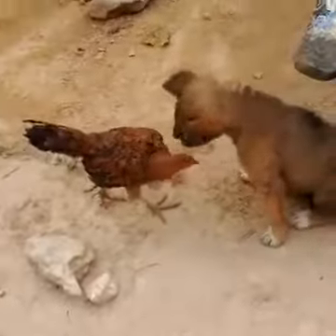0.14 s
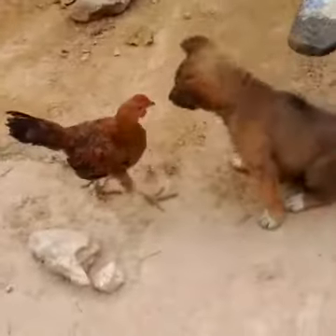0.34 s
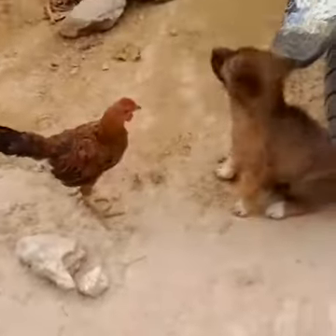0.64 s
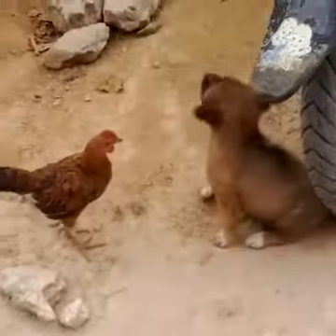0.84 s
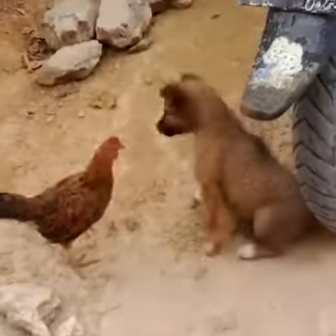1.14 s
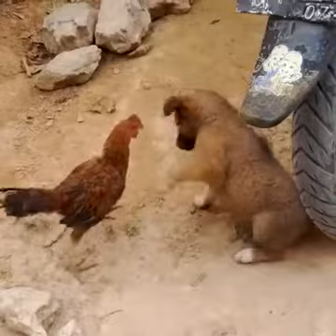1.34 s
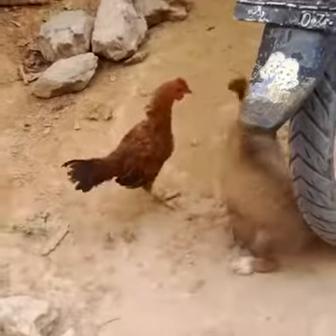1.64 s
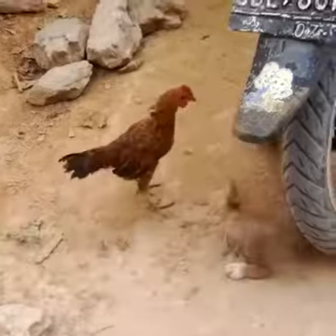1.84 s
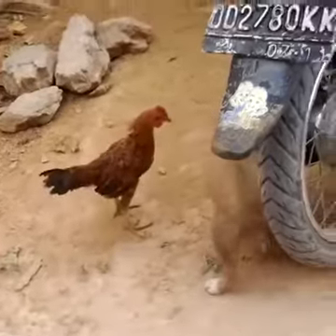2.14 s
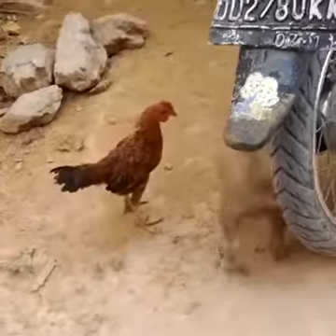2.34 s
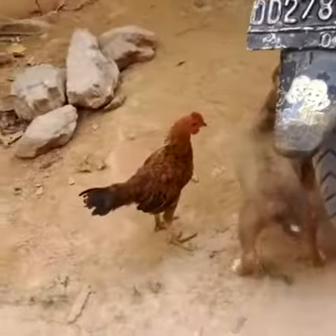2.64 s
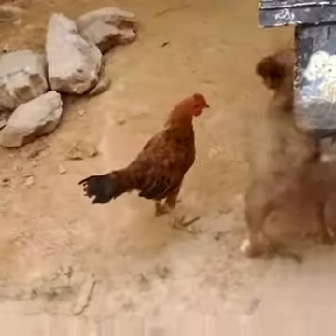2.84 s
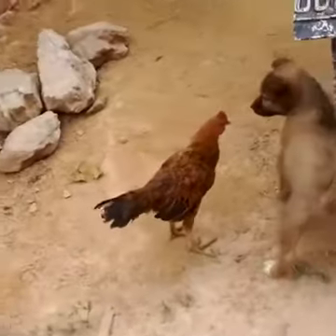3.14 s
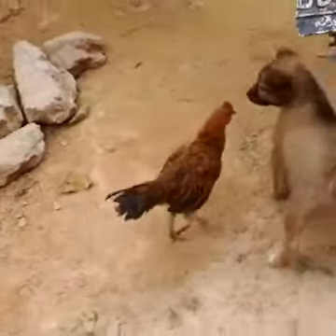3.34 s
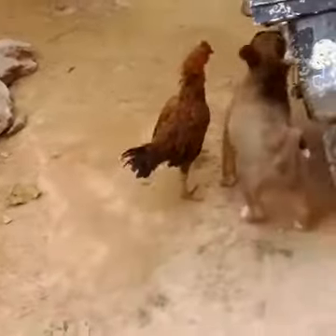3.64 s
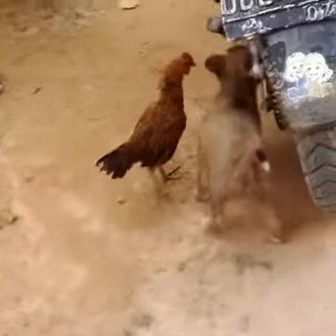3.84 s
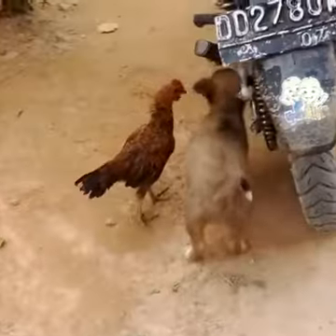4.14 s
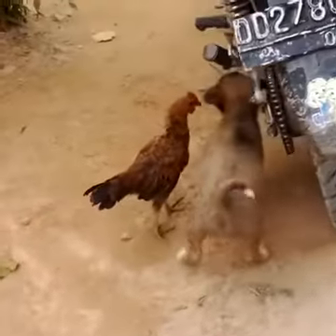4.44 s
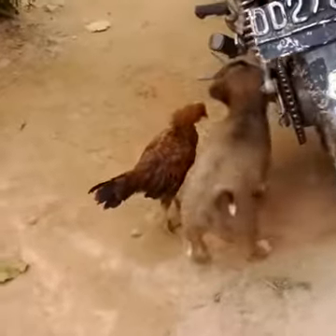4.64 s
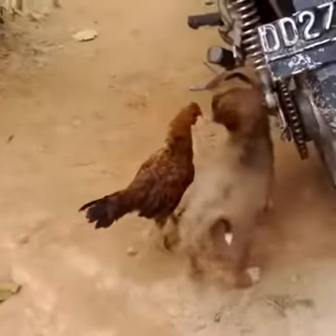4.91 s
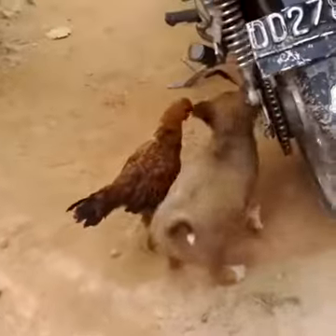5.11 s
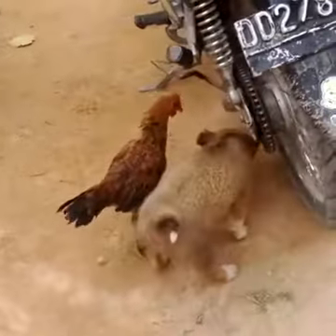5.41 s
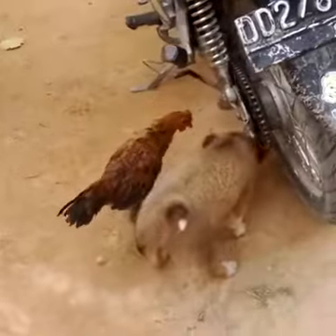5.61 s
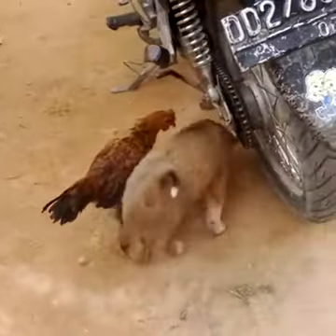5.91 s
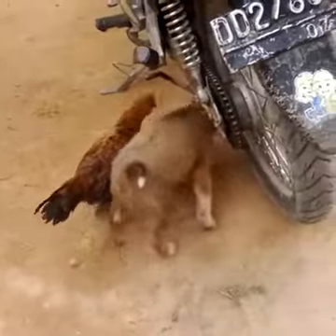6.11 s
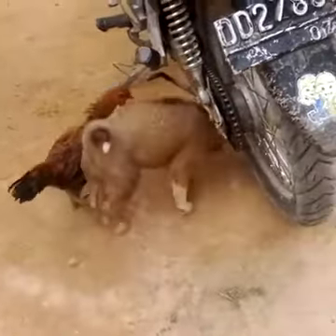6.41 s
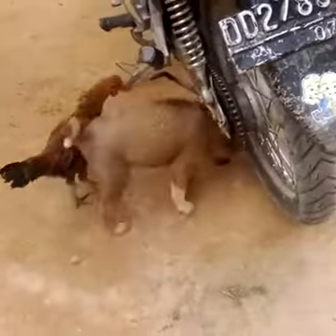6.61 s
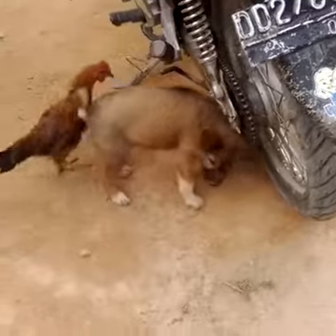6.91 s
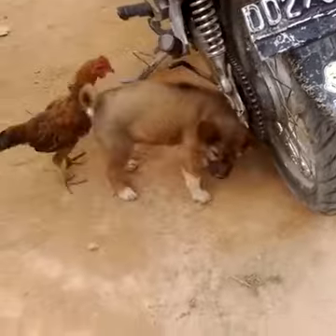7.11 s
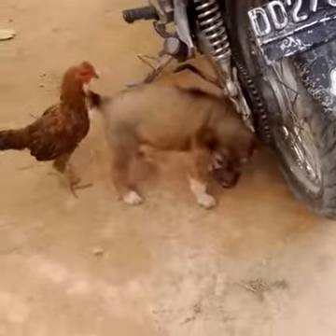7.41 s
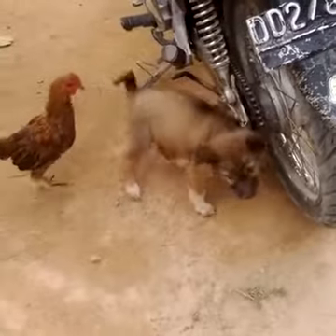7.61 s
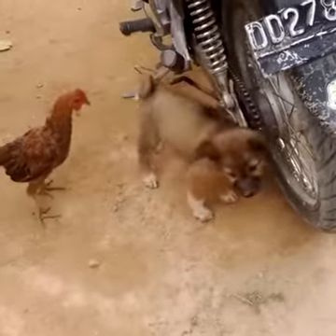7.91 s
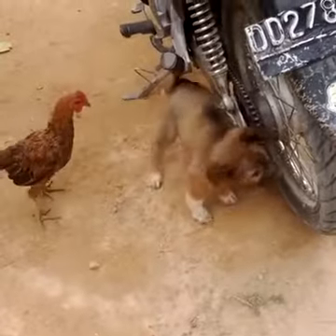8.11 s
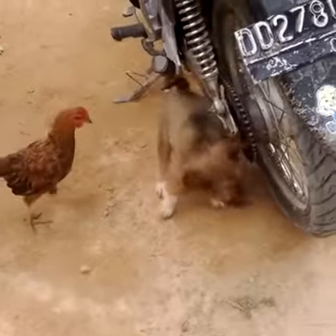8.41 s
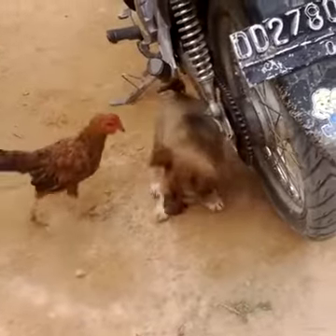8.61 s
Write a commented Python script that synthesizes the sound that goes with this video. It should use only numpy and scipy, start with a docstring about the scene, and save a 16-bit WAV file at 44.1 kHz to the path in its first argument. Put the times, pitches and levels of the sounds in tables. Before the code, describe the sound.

A puppy and chicken scuffle in grit, then a young cock crows close by, hoarse and breaking, over windy microphone rumble and distant steady pounding.

```python
"""Young cock in a dirt yard

Close to the microphone a chicken and a puppy scuffle: noise grains for grit, short clicks for pebbles.
A young cock crows close by, hoarse and breaking: two membranes of throbbing tones, with noise for air.
Far off something heavy is pounded at a steady pace: a soft push, ringing modes and a slap-back.
Wind puffs on the microphone as random soft lumps, over a thin hiss of drifting noise.
"""
import sys
import numpy as np
from scipy import signal
from scipy.fft import rfft, irfft
from scipy.io import wavfile
from scipy.ndimage import uniform_filter1d

SR = 44100
rng = np.random.default_rng(int(sys.argv[2]) if len(sys.argv) > 2 else 0)


def bounce(signal):
    """Save signal as a 16-bit WAV file at the path given by the first command-line argument."""
    frames = np.transpose(np.atleast_2d(signal))
    limited = np.clip(frames, -1, 1)
    pcm = np.round(limited * 32767).astype(np.int16)
    wavfile.write(sys.argv[1], SR, pcm)


N = 385875
T = np.arange(N) / SR
EDGE_HZ = 15750  # top of the recorder's band

# Open-air hiss. Each row: frequency in Hz, density in dB per Hz (relative).
HISS_COLOUR = [(59, -32), (100, -11.5), (229, -4), (295, -7), (502, -5), (648, -10), (1170, -13),
               (1910, -17), (3540, -18.5), (5300, -21.5), (6420, -12), (7450, -21), (9610, -26),
               (14100, -26.5), (16000, -22)]
HISS_DB = -57

# Wind on the microphone. Each row: time in seconds, large eddies and small eddies in dB (relative).
WIND_LEVELS = [(0, -48, -56), (.6, -54, -50), (.8, -56, -55), (1.25, -60, -57), (2.1, -59, -58),
               (2.3, -40, -52), (2.38, -33, -40), (2.68, -32, -31), (2.75, -52, -60), (3.3, -49, -56),
               (4.0, -52, -58), (5.05, -48, -58), (5.2, -43, -60), (5.62, -37, -46), (5.68, -46, -52),
               (6.1, -56, -59), (7.4, -51, -55), (7.7, -43, -60), (8.25, -48, -55), (8.75, -47, -55)]
# Single puffs of wind. Each row: peak time in seconds, level in dB (relative), length in seconds.
WIND_PUFFS = [(0, -30, .06), (.09, -34, .1), (.46, -43, .1), (.7, -48.5, .1), (2.19, -43, .12),
              (2.85, -34.5, .06), (3.02, -32, .07), (3.09, -35, .1), (3.24, -37.5, .12), (3.73, -43, .12),
              (3.87, -39, .1), (3.97, -33.5, .07), (4.09, -38.5, .1), (4.26, -38, .15), (4.46, -39, .12),
              (4.56, -33, .12), (5.12, -37, .1), (5.19, -35, .1), (5.39, -29, .1), (5.48, -27, .07),
              (5.61, -26, .05), (5.78, -37, .15), (5.85, -34.5, .08), (6.0, -42.5, .18), (6.24, -40, .1),
              (6.38, -38, .08), (6.68, -43, .15), (6.99, -47, .15), (7.14, -37, .07), (7.9, -34.5, .1),
              (8.04, -33, .12), (8.58, -42, .15), (8.7, -37, .08)]
PUFF_RISE, PUFF_FALL = .6, .7  # times for 20 dB, as shares of the length
PUFF_EDGE_DB = -17  # small eddies in a puff
RUMBLE_DB, RUMBLE_FALL_S = -9, .2  # rumble after a blow, before the wind mix; time for 20 dB

# Paws and claws dragged in grit. Each row: start of hold in seconds, hold in seconds,
# grit level in dB, dull part in dB.
PAW_SCUFFS = [(.062, .02, -68, -50), (.226, .008, -58, -50), (.284, .02, -52, -58), (.31, .035, -48, -54),
              (.352, .055, -49, -47), (.579, .012, -39, -38), (.598, .018, -35, -46)]
SCUFF_RISE_S, SCUFF_FALL_S = .006, .018  # times for 20 dB
# Colour of the grit. Each row: frequency in Hz, level in dB (relative).
GRIT_COLOUR = [(880, -28), (1500, -4.5), (2910, -8), (5830, -6), (8490, -15), (14100, -12), (16000, -5)]
# Colour of the dull drag beneath, same columns.
DRAG_COLOUR = [(120, -27), (250, 3), (600, 3), (1000, -7.5), (1500, -11), (2200, -27)]
# Single pebble clicks. Each row: start in seconds, level in dB, centre in Hz, knock in dB (relative).
PEBBLE_CLICKS = [(0.0624, -50, 14800, -57), (0.0757, -42, 14600, -56), (0.2224, -30, 13600, -30.5),
                 (0.2823, -31, 14000, -51), (0.5811, -29, 13800, -53), (0.7716, -43, 6840, -61),
                 (0.7924, -51, 6780, -63), (0.8074, -47, 6540, -61), (1.5544, -52, 14400, -58),
                 (1.5738, -38, 14100, -55), (1.7225, -41, 14100, -62)]
# Rustles of fur and feathers. Each row: peak in seconds, level in dB, fall in seconds for 20 dB.
RUSTLES = [(.07, -55, .2), (.22, -54, .03), (.31, -43.5, .19), (.585, -41, .06), (.77, -58, .15),
           (1.01, -66, .25), (1.32, -63, .35), (1.58, -56, .1), (1.73, -57, .2), (2.05, -66, .5),
           (2.19, -60, .2), (5.14, -61, .2), (5.77, -63, .12), (6.04, -67, .4), (6.19, -60, .35),
           (6.52, -63, .3), (6.75, -67, .8), (7.56, -61, .05), (7.64, -64, .27), (8.04, -68, .27),
           (8.21, -66, .4), (8.43, -63, .15)]
RUSTLE_RISE, RUSTLE_FLOOR_DB = .3, -73  # rise as a share of the fall; steady part
# Colour of the rustles. Each row: frequency in Hz, level in dB (relative).
RUSTLE_COLOUR = [(6000, -37), (10000, -16), (12500, -10.5), (14000, -1), (16000, -25)]

# Far pounding. Each row: start in seconds, push in dB, boom and gritty tick in dB (relative).
FAR_BLOWS = [(0.436, -26, -45, -54), (1.321, -23, -36, -57.5), (2.175, -30.5, -47, -59),
             (2.876, -30, -57, -65), (3.09, -25, -47, -57), (3.969, -30, -37, -51),
             (4.843, -25.5, -38.5, -66), (5.769, -28, -45, -68), (6.652, -33, -47.5, -64),
             (7.541, -22.5, -32, -58.5), (8.426, -24.5, -31, -67)]
# Ringing of the struck block. Each row: nominal frequency in Hz, level in dB (relative), t60 in seconds.
BLOCK_MODES = [(76.2, -10.5, 0.32), (223, -3.5, 0.12), (291.7, -11, 0.27), (381, -7, 0.095),
               (592, -19, 0.074), (780, -19.5, 0.075), (1150, -26, 0.071)]

# Low side of the syrinx, one table a syllable. Each row: time in seconds, pitch in Hz, then levels
# in dB (relative): first tone (the next two follow it), middle tones, treble tones.
LOW_SIDE = [
    [(2.675, 688, -55, -46, -60), (2.693, 669, -44, -40, -47), (2.72, 670, -46, -39, -46),
     (2.74, 643, -46, -41, -48), (2.77, 619, -49, -45, -53), (2.82, 615, -70, -57, -68)],
    [(3.01, 742, -58, -54, -58), (3.027, 759, -29.5, -55, -52), (3.1, 765, -28, -46, -46),
     (3.18, 748, -31, -47, -52), (3.29, 762, -30, -46, -39), (3.375, 748, -30, -47, -47),
     (3.42, 756, -40, -53, -50), (3.48, 726, -60, -64, -61)],
    [(3.59, 590, -54, -53, -58), (3.64, 630, -45, -46, -52), (3.685, 706, -37, -47, -49),
     (3.71, 797, -38, -45, -46), (3.74, 801, -56, -41, -45)],
    [(4.05, 750, -44, -37, -50), (4.07, 697, -40, -43, -47), (4.135, 722, -40, -41, -52),
     (4.18, 678, -34, -39, -51), (4.215, 692, -38, -41, -53), (4.256, 648, -40, -45, -51),
     (4.358, 615, -45, -47, -44), (4.46, 645, -40.5, -47, -52), (4.53, 655, -38.5, -44, -52),
     (4.545, 677, -41, -43, -52), (4.578, 671, -44, -41, -52), (4.7, 688, -39, -40, -50),
     (4.754, 697, -34.5, -40, -51), (4.802, 706, -32.5, -39, -49), (4.825, 728, -34, -44, -50),
     (4.866, 745, -33, -44, -52), (4.885, 690, -40, -43, -51), (4.915, 684, -33.5, -47, -51),
     (4.97, 668, -37.5, -47, -52), (4.985, 560, -41, -60, -59), (5.02, 545, -62, -62, -70)],
]
# High side, the held note, same columns.
HIGH_SIDE = [
    [(3.678, 965, -36, -48, -50), (3.705, 975, -35, -49, -49), (3.725, 906, -29, -38, -47),
     (3.801, 891.6, -29, -34, -48), (3.961, 872, -31.5, -38, -45), (4.02, 870, -31, -35, -47),
     (4.065, 872, -33, -38, -50), (4.115, 889, -34, -42, -46), (4.16, 879, -49, -55, -52)],
]
# Voice breaks, when the high side cuts in. Each row: start of hold in seconds, hold in seconds, pitch
# in Hz, then in dB (relative): first tone, drive of the next two, middle tones, air.
VOICE_BREAKS = [(2.677, .002, 880, -38, -46, -57, -55), (3.004, .005, 965, -39, -36, -52, -46),
                (3.082, .03, 850, -25, -26, -38, -44), (3.196, .01, 870, -30, -40, -55, -46),
                (3.266, .004, 994, -27, -30, -47, -47), (3.394, .01, 890, -30, -46, -57, -46),
                (3.983, .006, 884, -42, -45, -47, -37), (4.186, .018, 855, -37, -36, -48, -55),
                (4.83, .012, 900, -36, -36, -50, -47), (4.878, .014, 843, -31, -26, -42, -47),
                (4.985, .012, 885, -52, -46, -50, -43)]
BREAK_RISE_S, BREAK_FALL_S = .013, .018  # times for 20 dB
BREAK_TREBLE_DB, BREAK_HOARSE = -6, .62  # treble against the middle tones; least hoarseness at a break
# Hoarseness of the voice. Each row: time in seconds, hoarseness from 0 to 1.
HOARSENESS = [(2.66, .45), (2.82, .2), (3.03, .1), (3.07, .2), (3.1, .45), (3.48, .5), (3.6, .3),
              (3.66, .22), (3.7, .55), (3.74, .1), (4.045, .08), (4.07, .6), (4.14, .6), (4.21, .5),
              (4.26, .05), (4.5, .08), (4.55, .25), (4.6, .08), (5.0, .08)]
# How fast the three lowest tones throb. Each row: frequency in Hz, density in dB per Hz (relative).
LOW_THROB = [(10, -14), (40, 4.5), (110, -4), (250, -18), (500, -40)]
# How fast the upper tones throb, same columns.
UPPER_THROB = [(10, -13), (60, 3), (300, -7), (700, -41)]
# Throat colour of the second and third tone against the first. Each row: frequency in Hz, level in dB.
THROAT_COLOUR = [(1240, -3), (1330, -5), (1400, -8), (1520, -11), (1700, -10), (1770, -3), (1860, -9),
                 (1930, -26), (2080, -42), (2260, -20), (2600, -26), (3000, -33)]
# Windpipe colour of the upper tones. Each row: frequency in Hz, level in dB (relative).
PIPE_COLOUR = [(2300, -41.5), (2750, -18), (3200, -6.5), (3500, -11), (4100, -5.5), (4500, -6), (4720, -24),
               (4900, -33), (5500, -64), (6100, -13.5), (6800, -11), (7400, -27.5), (8300, -16.5),
               (10000, -25.5), (11800, -10), (12800, -27), (14200, -14), (16000, -39)]
# Air forced through the beak, one table a syllable. Each row: time in seconds, level in dB (relative).
BEAK_AIR = [
    [(2.66, -71), (2.702, -48), (2.768, -42), (2.85, -63)],
    [(2.99, -60), (3.03, -41), (3.24, -39), (3.39, -42), (3.504, -54), (3.55, -53)],
    [(3.55, -51), (3.658, -42), (3.8, -39), (3.892, -41), (3.96, -54), (4.04, -51), (4.074, -40.5),
     (4.272, -60), (4.82, -60), (4.95, -54), (5.05, -70)],
]
# Colour of that air. Each row: frequency in Hz, level in dB (relative).
BEAK_COLOUR = [(400, -33), (800, -2), (1150, -8.5), (1550, -1.5), (1900, -2), (2250, -13), (2900, -14),
               (4550, -1), (5500, -15), (6100, 0.5), (7200, -3), (8600, 4), (10300, -9), (11700, -2),
               (12900, -11), (13900, 2), (16000, 0)]
AIR_PATCH_DB = 4  # the air gathers in short, narrow streaks
WOBBLE_HZ = 26  # pitch shake per unit of hoarseness
DIP_HZ = 5300  # windpipe dip, where middle tones give way to treble
WALLS_DB = -13  # echo level
CROW_SPAN = slice(round(2.6 * SR), round(2.6 * SR) + 110592)  # samples in which the voice sounds


def amp(db):
    """Amplitude factor of a level in dB."""
    return 10 ** (np.asarray(db) / 20)


def evened(x):
    """Scales x to rms 1."""
    return x / np.sqrt(np.mean(x ** 2) + 1e-20)


def read(points, hz):
    """Reads a table of frequency and level along a log frequency axis."""
    f, value = np.transpose(points)
    return np.interp(np.log(hz + 1), np.log(f + 1), value)


def add(mix, s, sound):
    """Adds a sound into the mix at s seconds, cut at the end of the mix."""
    part = mix[round(s * SR):][:len(sound)]
    part += sound[:len(part)]


def coloured(x, points):
    """Filters x by the table, at rms 1."""
    gain = amp(read(points, np.fft.rfftfreq(len(x), 1 / SR)))
    return evened(irfft(rfft(x) * gain, len(x)))


def slow(hz):
    """Noise that wanders up to about hz, at rms 1."""
    return evened(signal.lfilter(*signal.butter(2, hz, fs=SR), rng.standard_normal(N)))


def level(tables, column, fade=.006):
    """Gain along the tables, silent between them; tables that touch cross-fade."""
    out = np.zeros(N)
    for rows in tables:
        rows = np.array(rows)
        t = np.arange(max(rows[0, 0] - fade / 2, 0), rows[-1, 0] + fade / 2, 1 / SR)
        edge = np.clip(np.minimum(t - t[0], t[-1] - t) / fade, 0, 1)
        add(out, t[0], edge * amp(np.interp(t, rows[:, 0], rows[:, column])))
    return out


def swells(s, db, rise, fall, hold=0):
    """Gain of events that climb 20 dB in rise, hold, and drop 20 dB in fall."""
    out = np.zeros(N)
    for s, db, rise, fall, hold in np.broadcast(s, db, rise, fall, hold):
        t = np.arange(-min(2 * rise, s), hold + 2 * fall, 1 / SR)
        climb = 20 * np.minimum(t, 0) / rise
        drop = 20 * np.maximum(t - hold, 0) / fall
        add(out, s + t[0], amp(db + climb - drop))
    return out


def streaky(x, patch_db):
    """Lifts and lowers small patches of time and pitch at random, at rms 1."""
    z = signal.stft(x, nperseg=512, noverlap=384)[2]
    patches = uniform_filter1d(rng.standard_normal(z.shape), size=3, axis=0)
    patches = evened(uniform_filter1d(patches, size=12, axis=1))
    return evened(signal.istft(z * amp(patch_db * patches), nperseg=512, noverlap=384)[1][:len(x)])


def yard():
    """Steady open-air hiss with a faint insect band, in drifting patches of noise."""
    frames = N // 128 + 5
    a, b, patches = rng.standard_normal((frames, 257, 3)).T
    patches = evened(uniform_filter1d(uniform_filter1d(patches, 6, 0), 16, 1))
    hiss = signal.istft((a + 1j * b) * amp(1.47 * patches), nperseg=512, noverlap=384)[1][:N]
    return amp(HISS_DB) * coloured(hiss, HISS_COLOUR)


def wind():
    """Eddies push the membrane in soft lumps, small ones joining in gusts; like lumps follow each blow."""
    s, db, small_db = np.transpose(WIND_LEVELS)
    at, puff_db, span = np.transpose(WIND_PUFFS)
    puffs = swells(at, puff_db, PUFF_RISE * span, PUFF_FALL * span)
    large = amp(np.interp(T, s, db)) + puffs
    rumble = swells([blow[0] + .02 for blow in FAR_BLOWS],
                    [blow[2] + RUMBLE_DB for blow in FAR_BLOWS], .01, RUMBLE_FALL_S)
    small = amp(np.interp(T, s, small_db)) + amp(PUFF_EDGE_DB) * puffs + rumble
    # Each row: lump width in seconds, lumps per second, spread of their sizes in dB, gain over time.
    eddies = [(0.0058, 120, 1.4, 0.62 * large),
              (0.0038, 80, 1.6, 0.95 * large),
              (0.0026, 54, 3.5, 0.6 * large + .6 * rumble),
              (0.0014, 90, 3.6, small)]
    t, out = np.arange(-2000, 2000) / SR, np.zeros(N)
    for width, per_s, spread_db, gain in eddies:
        size = amp(spread_db * np.minimum(rng.exponential(1, N), 4))
        strikes = size * (rng.random(N) < per_s / SR)
        lump = (1 - (t / width) ** 2) * np.exp(-(t / width) ** 2 / 2)
        out += gain * evened(signal.oaconvolve(strikes, lump, "same"))
    return out * amp(-6)


def scuffle():
    """Grit crunches in dense grains, with a dull drag beneath, single clicks and high rustles."""
    grains = rng.standard_normal(N) * amp(1.7 * slow(300) + 2.0 * slow(58))
    at, hold, grit_db, dull_db = np.transpose(PAW_SCUFFS)
    out = coloured(grains, GRIT_COLOUR) * swells(at, grit_db, SCUFF_RISE_S, SCUFF_FALL_S, hold)
    out += coloured(grains, DRAG_COLOUR) * swells(at, dull_db, SCUFF_RISE_S, SCUFF_FALL_S, hold)
    t = np.arange(1500) / SR
    for s, db, hz, knock_db in PEBBLE_CLICKS:
        knock = amp(knock_db - 7.5 - 60 * t / 0.024) * np.sin(2 * np.pi * 900 * t)
        click = np.cos(2 * np.pi * hz * t) + 0.49 * rng.standard_normal(len(t))
        add(out, s, knock)
        add(out, s, amp(db - 60 * t / 0.0027) * click)
    rustle = coloured(rng.standard_normal(N) * amp(1.9 * slow(31)), RUSTLE_COLOUR)
    at, db, fall = np.transpose(RUSTLES)
    return out + rustle * (swells(at, db, RUSTLE_RISE * fall, fall) + amp(RUSTLE_FLOOR_DB))


def pounding():
    """A soft push, the block ringing in decaying modes, a gritty tick, and a slap-back from a wall."""
    out, t = np.zeros(N), np.arange(SR // 3) / SR
    u = t - .0115  # seconds from the middle of the push
    chances = rng.random((len(FAR_BLOWS), len(BLOCK_MODES)))
    for (s, db, boom_db, tick_db), chance in zip(FAR_BLOWS, chances):
        push = np.cos(2 * np.pi * (120 * u - 1500 * u ** 2))  # sags in pitch
        push *= np.exp(-(u / np.where(u < 0, .004, .011)) ** 2)
        ring = np.zeros(len(t))
        for (hz, mode_db, t60), c in zip(BLOCK_MODES, chance):
            struck_hz = hz * (.95 + .1 * c)  # each blow shifts every mode by up to 5 %
            ring += amp(mode_db - 60 * t / t60) * np.sin(2 * np.pi * (struck_hz * u + 0.31 * c))
        blow = amp(db) * push + amp(boom_db + 8) * ring * np.clip((t - .003) / 0.0073, 0, 1)
        add(out, s, blow)
        add(out, s + .047, -amp(-18.5) * blow)  # slap-back
        grit = np.diff(rng.standard_normal(len(t) + 2), 2)  # tilted to the treble
        add(out, s, amp(tick_db - 60 * t / 0.053) * grit)
    return out


def syrinx(pitch, gains, rough, shake):
    """One membrane: clean tones that throb and spread upward in pitch as it turns hoarse."""
    s, hz = np.transpose(sorted(pitch))
    a, b = CROW_SPAN.start, CROW_SPAN.stop
    hz = uniform_filter1d(np.interp(T, s, hz), size=400)[a:b]
    rough = rough[a:b]
    shaken_hz = hz + WOBBLE_HZ * (rough + 0.081) * slow(119.77)[a:b]
    turn = np.exp(2j * np.pi * np.cumsum(shaken_hz) / SR)
    tones = [0] * 5  # first, second, third, middle, treble
    for k in range(1, 4):
        tones[k - 1] = amp(read(THROAT_COLOUR, k * hz) * (k > 1)) * turn ** k * np.exp(1j * k)
    wave, coarse = turn ** 3, T[a:b:64]
    for k in range(4, 28):
        wave = wave * turn
        # each tone swells on its own
        drift_db = 3.3 * np.interp(coarse, T[::1500], rng.standard_normal(len(T[::1500])))
        tone_hz = k * hz[::64]
        gain = amp(read(PIPE_COLOUR, tone_hz) + drift_db) * (tone_hz < EDGE_HZ)
        tone = np.interp(T[a:b], coarse, gain) * wave * np.exp(1j * k * k)
        tones[3] = tones[3] + tone * (k * hz < DIP_HZ)
        tones[4] = tones[4] + tone * (k * hz >= DIP_HZ)
    out = np.zeros(N)
    tone_gains = [gains[0], gains[1], *gains[1:]]  # second and third tone share one drive
    for k, (tone, gain) in enumerate(zip(tones, tone_gains)):
        throb = coloured(rng.standard_normal(b - a), LOW_THROB if k < 3 else UPPER_THROB)
        kick = shake * rough * signal.hilbert(throb)  # spreads each tone upward only
        hoarse_tone = tone * gain[a:b] * (1 + kick) / np.hypot(1, shake * rough)
        out[a:b] += np.sqrt(2) * hoarse_tone.real
    return out


def crow():
    """Both membranes and the air; the windpipe passes little bass; nearby walls give a short tail."""
    s, hold, hz, db, next_db, middle_db, air_db = np.transpose(VOICE_BREAKS)
    break_levels = (db, next_db, middle_db, middle_db + BREAK_TREBLE_DB, air_db, 0)
    *break_tones, break_air, break_shape = [
        swells(s, d, BREAK_RISE_S, BREAK_FALL_S, hold) for d in break_levels]
    rough = np.maximum(np.interp(T, *np.transpose(HOARSENESS)), BREAK_HOARSE * np.sqrt(break_shape))

    air = coloured(rng.standard_normal(N) * amp(1.5 * slow(55)), BEAK_COLOUR)
    air_gain = (level(BEAK_AIR, 1, 0.0037) + break_air + 1e-9) * amp(-5.0)
    air = streaky(air, AIR_PATCH_DB) * air_gain
    low_air = signal.sosfilt(signal.butter(4, DIP_HZ, fs=SR, output="sos"), air)
    rasp = amp(14. * (rough + 0.5))  # lifts the lower air, most in hoarse parts

    columns = [2, 2, 3, 4]  # first tone, next two, middle, treble
    low_pitch = [row[:2] for note in LOW_SIDE for row in note]
    low = syrinx(low_pitch, [level(LOW_SIDE, k) for k in columns], rough, 1.1)
    high_pitch = [row[:2] for row in HIGH_SIDE[0]] + [*zip(s, hz), *zip(s + hold, hz)]
    high_gains = [level(HIGH_SIDE, k) + part for k, part in zip(columns, break_tones)]
    high = syrinx(high_pitch, high_gains, rough, 0.71)

    bass_cut = signal.butter(4, 520, "high", fs=SR, output="sos")
    voice = signal.sosfilt(bass_cut, low + high + air + (rasp - 1) * low_air)
    t = np.arange(SR // 2) / SR
    tail = rng.standard_normal(len(t)) * amp(-60 * t / 0.38) * (t > .008)
    return voice + amp(WALLS_DB) * signal.oaconvolve(voice, tail / np.linalg.norm(tail))[:N]


def scene():
    """The whole yard at one microphone, as a single channel."""
    return (yard() + wind() + scuffle() + pounding() + crow())[None]


def record(dry):
    """The recorder's band limit: a steep low-pass at EDGE_HZ."""
    lowpass = signal.firwin(511, EDGE_HZ, window=("kaiser", 9), fs=SR)
    return signal.oaconvolve(dry, lowpass[None], "same")


dry = scene()
out = record(dry)
bounce(out)
```